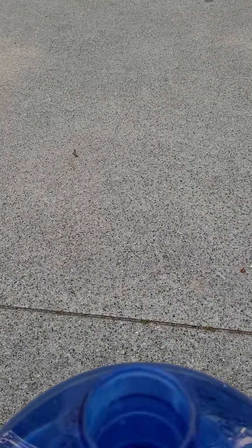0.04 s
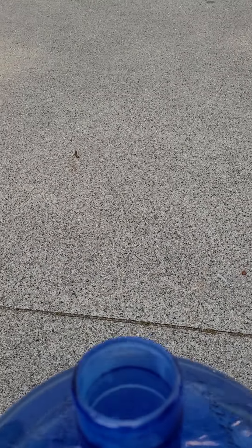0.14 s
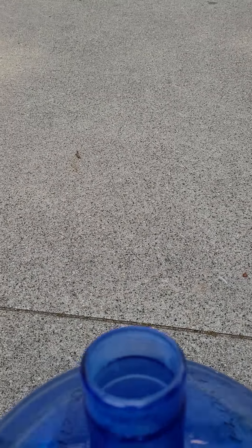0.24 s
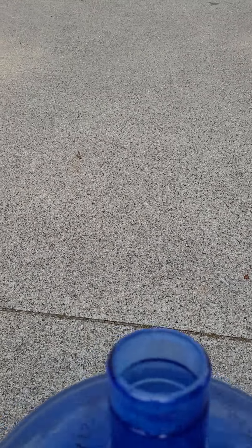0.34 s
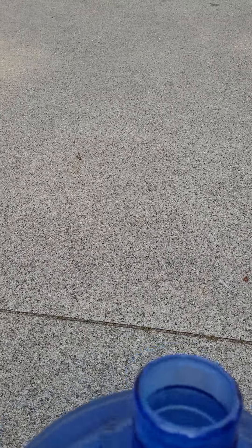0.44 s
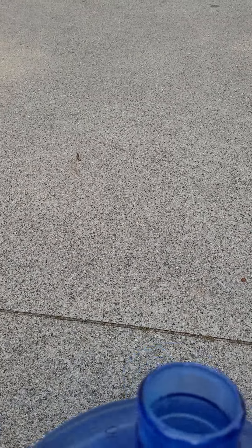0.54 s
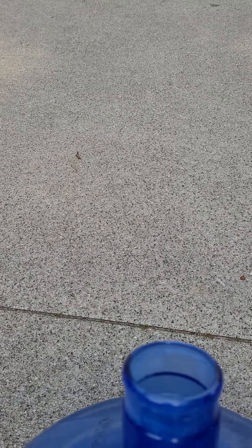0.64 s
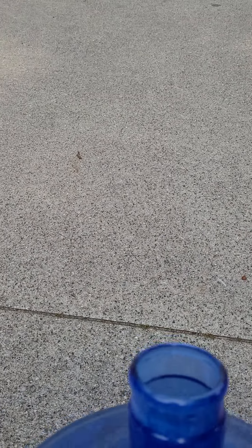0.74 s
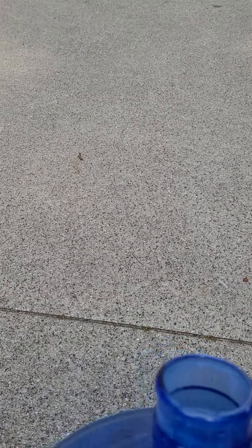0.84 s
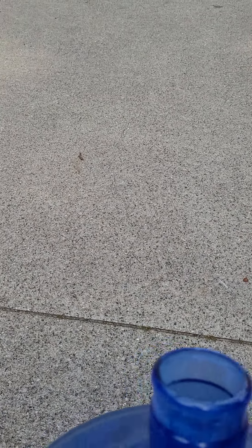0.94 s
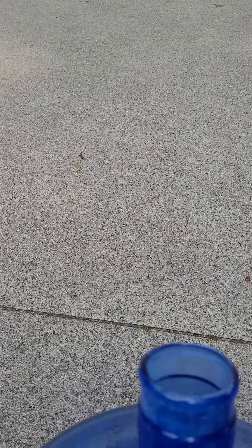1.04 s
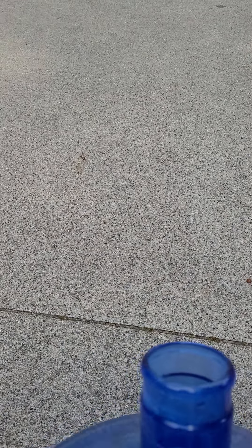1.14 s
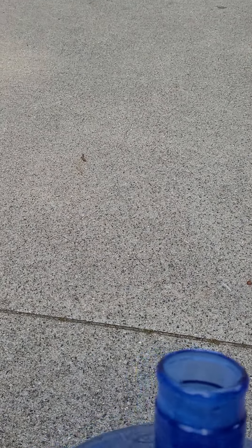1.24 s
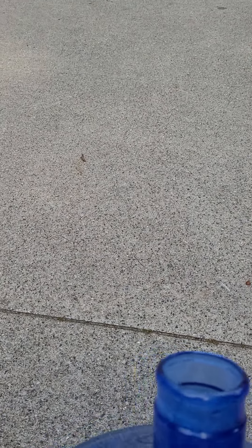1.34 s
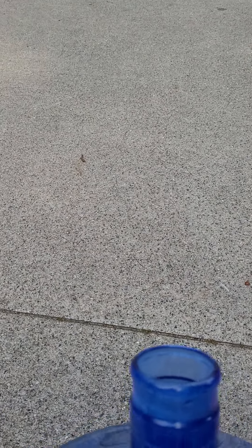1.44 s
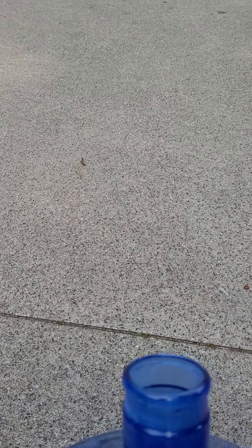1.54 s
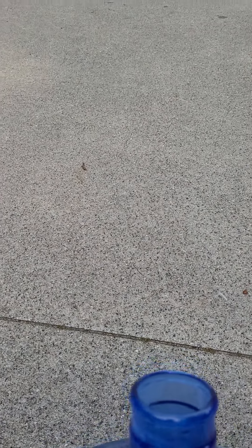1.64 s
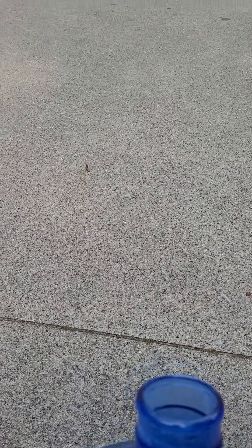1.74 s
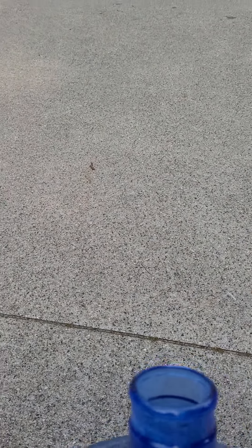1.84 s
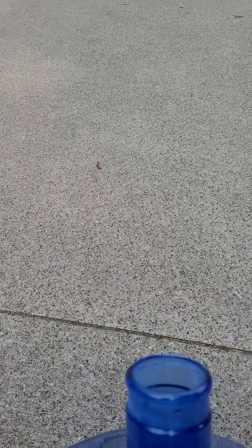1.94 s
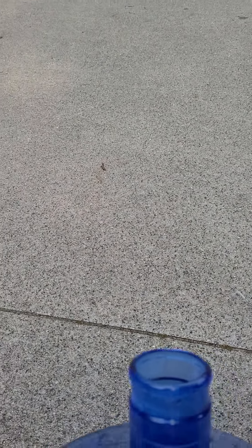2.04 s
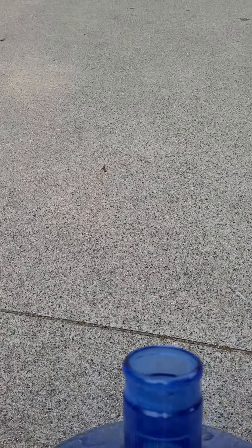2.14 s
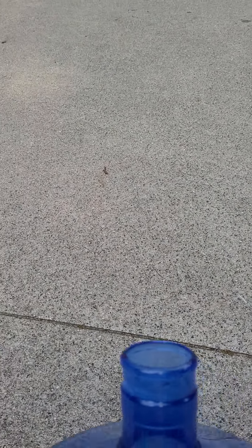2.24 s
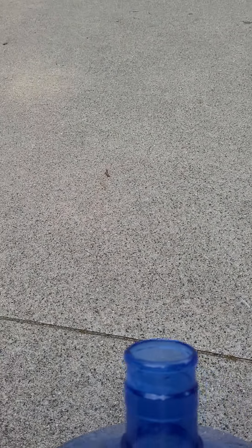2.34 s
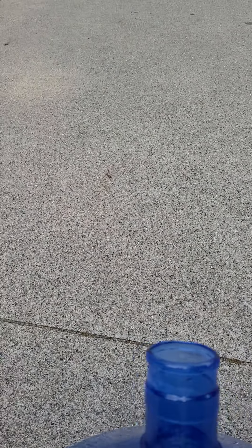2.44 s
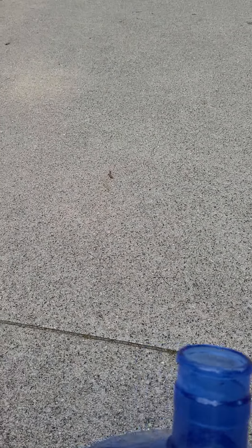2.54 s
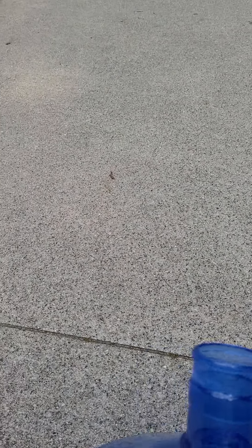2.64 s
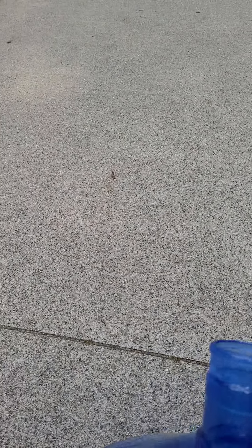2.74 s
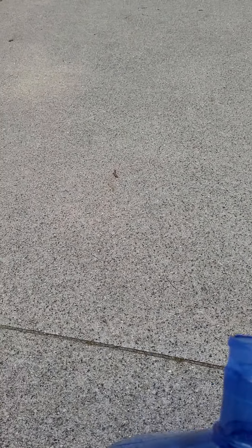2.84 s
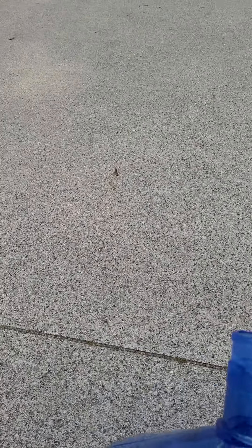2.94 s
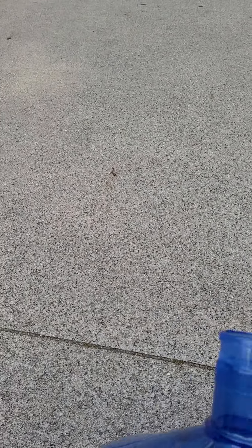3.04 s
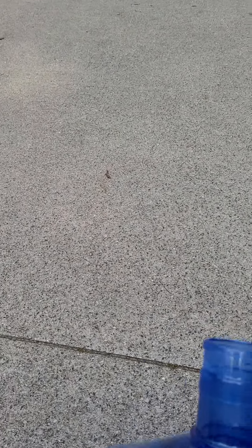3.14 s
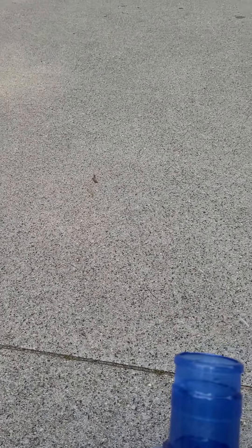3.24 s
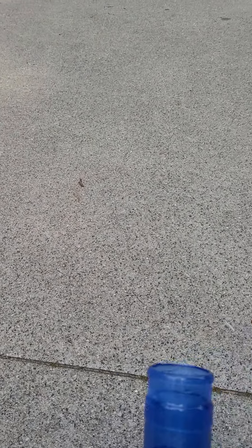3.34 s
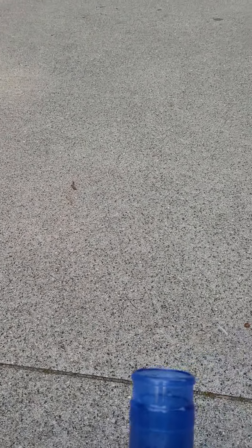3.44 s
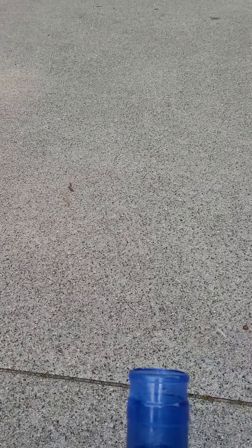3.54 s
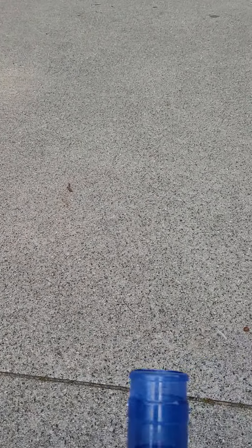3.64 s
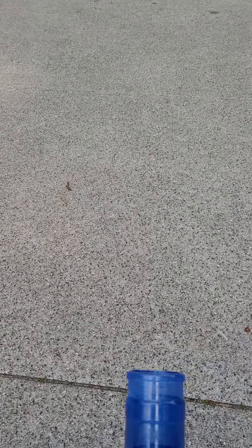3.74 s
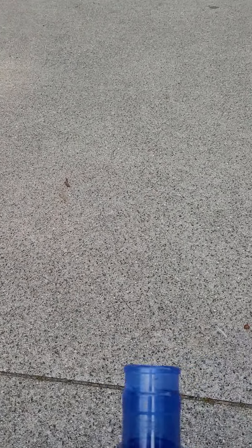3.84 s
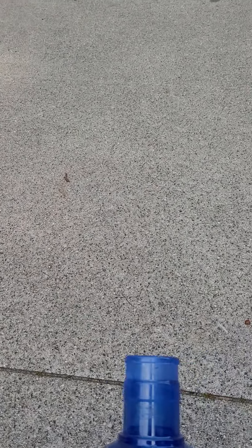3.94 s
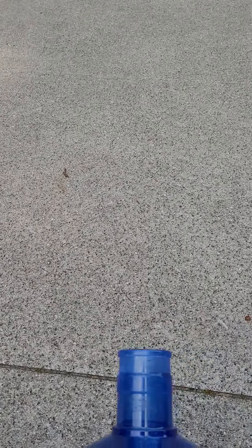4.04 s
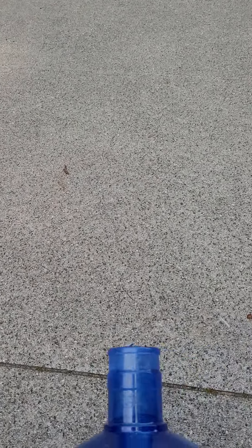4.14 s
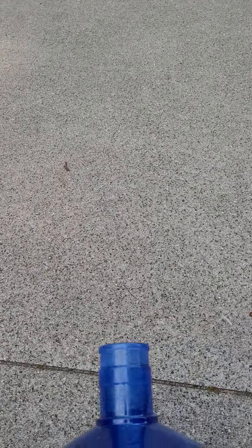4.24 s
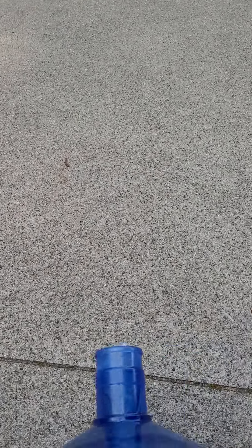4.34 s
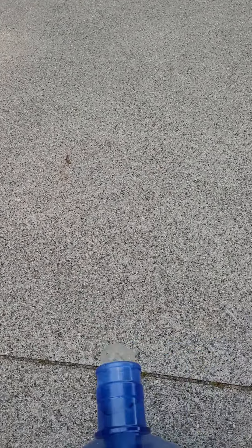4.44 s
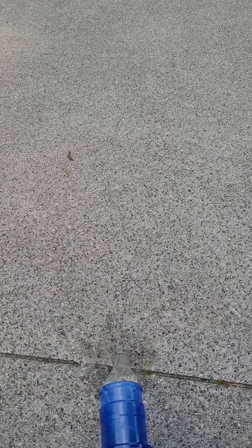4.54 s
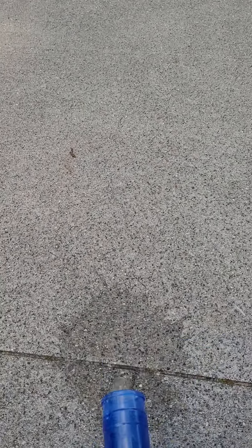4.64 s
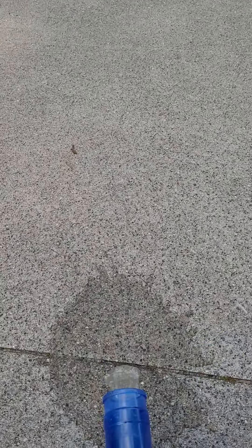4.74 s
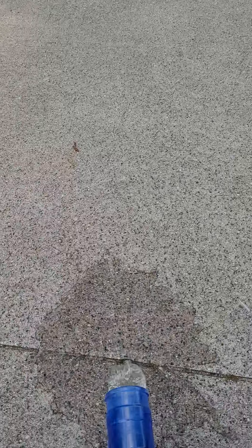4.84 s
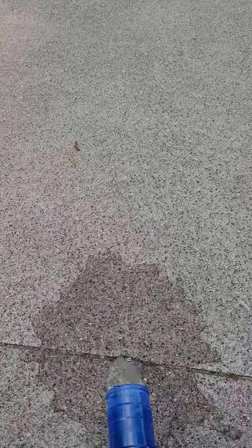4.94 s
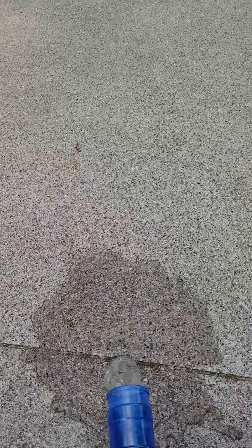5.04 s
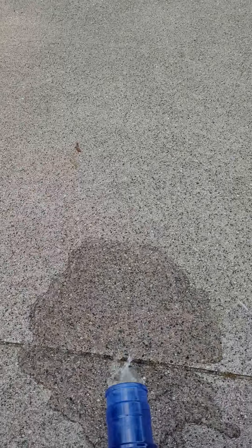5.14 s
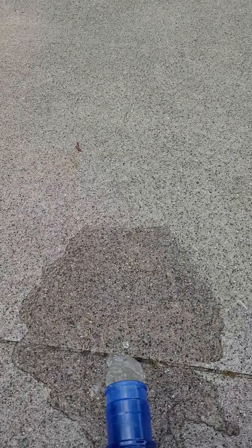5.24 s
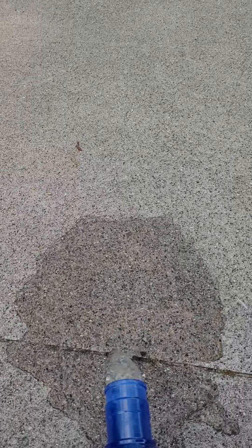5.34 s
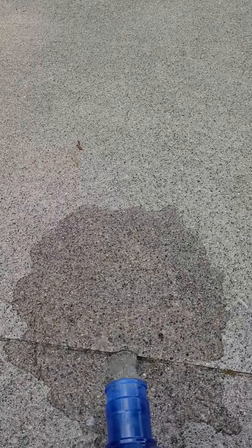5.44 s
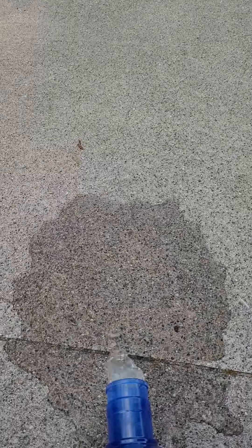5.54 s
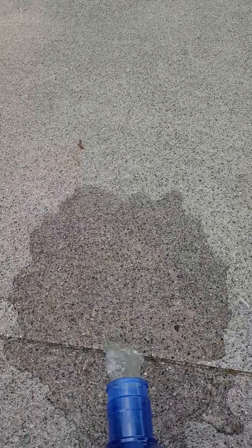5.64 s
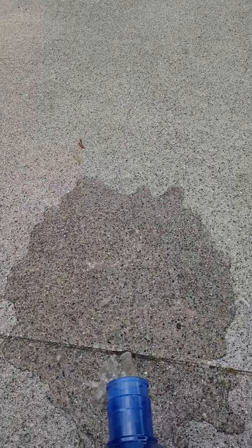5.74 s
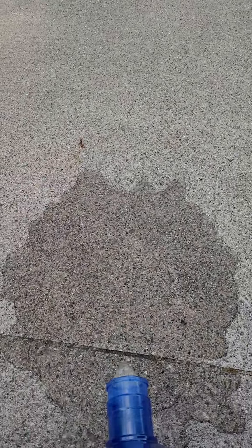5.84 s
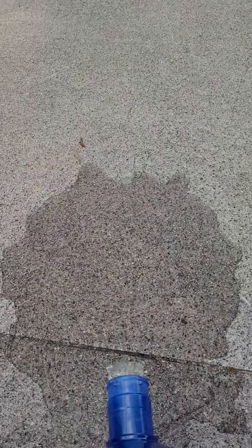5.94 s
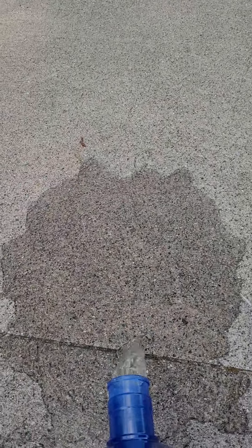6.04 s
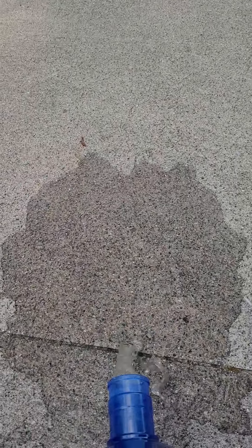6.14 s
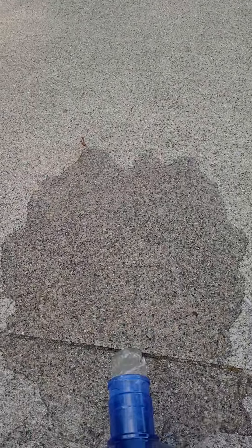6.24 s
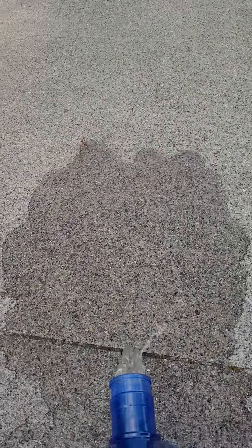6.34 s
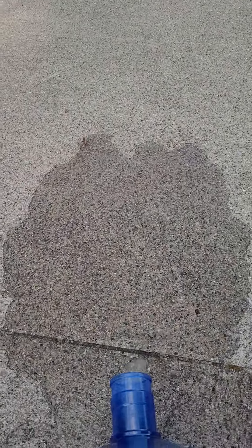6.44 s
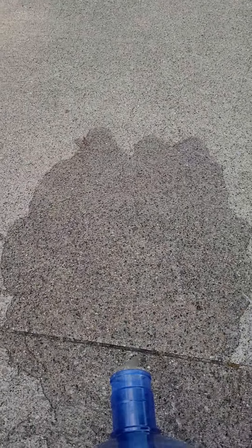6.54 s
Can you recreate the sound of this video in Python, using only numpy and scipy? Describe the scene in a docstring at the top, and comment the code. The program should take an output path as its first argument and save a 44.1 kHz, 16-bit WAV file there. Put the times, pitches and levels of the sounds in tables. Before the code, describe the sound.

Close hand-held phone outdoors, with soft air noise and low grip rumble. From 0 to about 0.9 s a large plastic bottle is dragged over concrete: hollow low drones with gritty stick-slip scraping, strongest from 0.3 s, a knock at 0.16 s and a sharp tick near 0.56 s. Another short drag groans at 1.1-1.35 s with a small clink and rumbling lumps. From 1.5 to 2.8 s come faint scuffs, plastic clicks and dull bumps; then it is mostly quiet, with a small pop at 3.1 s and light rustle. Around 4.3 s water sloshes toward the neck, hissing out at 4.5 s, with a heavy hollow thump near 4.7 s. Until 6.6 s it glugs irregularly, with prominent gulps at about 5.1, 5.5, 5.65, 5.9 and 6.3 s, rising bubble tones, thin watery whistles, wet slaps and droplets spattering on the slab.

```python
"""A hollow drone and a gritty scrape come first: a big plastic water bottle dragged over a concrete slab outdoors.
It is heard close, on a hand-held phone: stick-slip noise rings the body modes under cloth rustle and rumble.
Blows ring the body, ticks are short noise; water glugs from the neck as rising sines and splashes as small chirps.
The left microphone port is shaded: duller and slightly late."""
import sys
import numpy as np
from scipy import signal
from scipy.fft import rfft, irfft, next_fast_len
from scipy.io import wavfile
from scipy.ndimage import uniform_filter1d

SR = 44100
rng = np.random.default_rng(int(sys.argv[2]) if len(sys.argv) > 2 else 0)


def waveform_to_disk(signal):
    """Save audio, clipped to [-1, 1], as 16-bit WAV at the path in sys.argv[1]."""
    frames = np.transpose(np.atleast_2d(signal))
    scaled = np.clip(frames, -1, 1) * 32767
    samples = np.round(scaled).astype(np.int16)
    wavfile.write(sys.argv[1], SR, samples)


N = 290199

# modes of the bottle's wall and air: f/Hz, width/Hz (rubbing widens it), level/dB
BODY_MODES = [(58.7, 31, -6), (150.4, 19.2, -4), (219.7, 27, -6.5), (291.1, 32.7, 2.5), (364, 22.7, 1),
              (499, 520, -14), (671, 18, -12), (1003, 200, -4), (1418, 120, -6), (1940, 230, -8)]
# dull blows on the body, from knocks and from gulps of air:
# t/s, level/dB before a common cut, favoured f/Hz, t60/s, churn after it re blow/dB before the band mix
BLOWS = [(0.161, -24, 373, 0.072, -13.5), (2.211, -27, 154, 0.86, -19), (2.445, -33.5, 149, 0.24, -15),
         (2.788, -34, 60.4, 0.049, -13), (3.548, -46, 69.4, 0.09, -21), (4.679, -11, 316, 0.082, -42),
         (4.685, -16.5, 68.5, 0.41, -17), (4.876, -25, 341, 0.14, -12), (4.907, -19, 298, 0.12, -25),
         (4.928, -19.5, 256, 0.1, -35), (4.964, -35, 387, 0.12, -8), (4.996, -29, 261.5, 0.37, -23),
         (5.125, -30, 116.5, 0.79, -0.5), (5.195, -34, 149, 0.015, -8), (5.216, -21, 423, 0.17, -11.5),
         (5.264, -31, 72.8, 0.9, -23), (5.508, -30, 242, 0.072, -16), (5.531, -27.5, 130, 0.5, -15),
         (5.532, -13.5, 439, 0.056, -21), (5.652, -35, 80, 0.1, -12), (5.756, -24.5, 142, 0.22, -35),
         (5.907, -22, 124, 0.33, -10), (5.956, -24.5, 76, 0.39, -11), (6.157, -20.5, 125.7, 0.31, -46),
         (6.251, -27.5, 95.5, 0.36, -16), (6.334, -25, 101, 0.094, -6.5), (6.366, -26, 139, 0.35, -27),
         (6.537, -21.5, 149, 0.13, -21)]
# water surges into the neck, then runs:
# t/s, slosh drone level/dB, upper body modes re drone/dB before their mix, splash level/dB before clumping
SURGES = [(4.27, -48.5, -6.5, -70), (4.39, -45, 14, -60), (4.56, -39, 11, -53.5), (4.7, -40, 11, -44.5),
          (4.78, -39, -9, -60.5), (4.93, -45, 2, -50), (5.05, -50, -19, -66), (5.2, -45.5, -2, -42.5),
          (5.35, -42.5, -10.5, -63), (5.6, -51, 1, -63), (5.96, -47, -0.5, -58), (6.58, -56, 0, -67)]


def gain_of(db):
    """Decibels to a factor."""
    return 10 ** (np.asarray(db) / 20)


def evened(x):
    """Scaled to rms 1."""
    return x / np.sqrt(np.mean(x ** 2) + 1e-20)


def read(points, hz):
    """A spectrum table on a log-frequency axis."""
    f, value = np.transpose(points)
    return np.interp(np.log(hz + 1), np.log(f + 1), value)


def curves(rows, off=None):
    """Every column of a time table, one value a sample; off is the value outside the table."""
    s, *columns = np.transpose(rows)
    return [np.interp(np.arange(N) / SR, s, c, off, off) for c in columns]


def add(mix, s, sound):
    """Lays a sound into the mix at a time in seconds."""
    part = mix[..., round(s * SR):][..., :sound.shape[-1]]
    part += sound[..., :part.shape[-1]]


def colour(x, db, lag_s=0):
    """Filters by a function of frequency giving dB, with an optional delay."""
    size = next_fast_len(x.shape[-1] + 512)
    hz = np.fft.rfftfreq(size, 1 / SR)
    response = gain_of(db(hz)) * np.exp(-2j * np.pi * hz * lag_s)
    return irfft(rfft(x, size) * response, size)[..., :x.shape[-1]]


def ring(x, hz, width):
    """One resonance, centre and width in Hz; at 0 Hz it is a lowpass."""
    r = np.exp(-np.pi * width / SR)
    return 2 * signal.lfilter([1 - r], [1, -r * np.exp(2j * np.pi * hz / SR)], x).real


def ring_twice(x, hz, width, second_width=None):
    """The same centre rung twice, for steeper skirts."""
    return ring(ring(x, hz, width), hz, second_width or width)


def random_hits(per_s, spread_db, longest=5):
    """Sparse impulses at random times; sizes spread exponentially in dB, up to a limit in spreads."""
    size = gain_of(spread_db * np.minimum(rng.exponential(1, N), longest))
    return size * (rng.random(N) < per_s / SR)


def grains(per_s, spread_db, hiss):
    """Sparse clicks of uneven size and either sign over a share of plain noise."""
    clicks = random_hits(per_s, spread_db) * rng.choice([-1., 1.], N)
    return evened(evened(clicks) + hiss * rng.standard_normal(N))


def bands(noise, hz, treble_db, sharp):
    """Noise with a peak at its centre, a broad floor around it and a share of treble."""
    peak = ring_twice(noise[0], hz, sharp * hz)
    floor = ring_twice(noise[0], 0.76 * hz + 900, 3600)
    body = evened(peak) + 0.39 * evened(floor)
    treble = ring(ring(noise[1], 10060, 4800), 13800, 4200)
    return evened(body) + gain_of(treble_db) * evened(treble)


def ports(x, shade, lag_s):
    """One sound at both ports: the left shaded, late and smeared as sound creeps round the hand."""
    scatter_db, scatter_t60_s = 1, 0.012
    t = np.arange(400) / SR
    taps = rng.standard_normal(400) * gain_of(-60 * t / scatter_t60_s)
    smear = signal.oaconvolve(x, taps / np.linalg.norm(taps))[:N]
    smear = colour(smear, lambda hz: scatter_db - 40. * (hz < 2600))  # mainly treble
    left = colour(x + smear, lambda hz: read(shade, hz) / 2, lag_s)
    right = colour(x, lambda hz: -read(shade, hz) / 2)
    return np.array([left, right])


def wide(table, patchy_db):
    """Noise with patches drifting in time and frequency, most alike at the two ports in the bass."""
    # left-right likeness of the diffuse sound: f/Hz, correlation (1 is identical)
    likeness = [(60, 0.88), (180, 1), (550, 0.35), (1650, -0.16), (4970, 0.1), (15000, -0.035)]
    # shading of the diffuse sound: f/Hz, left minus right level/dB
    far_shade = [(60, -0.5), (150, -2), (380, -2), (950, -2), (2380, -11), (5980, -20.5), (15000, -11)]
    frames, hz = N // 256 + 5, np.fft.rfftfreq(1024, 1 / SR)
    a, b, c, d, patches = rng.standard_normal((frames, 513, 5)).T
    patches = evened(uniform_filter1d(uniform_filter1d(patches, 14, 0), 12, 1))
    same = np.clip(read(likeness, hz), -1, 1)[:, None]
    shade_db = read(far_shade, hz)[:, None] / 2
    left = a + 1j * b
    right = same * left + np.sqrt(1 - same ** 2) * (c + 1j * d)
    z = np.array([left * gain_of(shade_db), right * gain_of(-shade_db)])
    z = z * gain_of(read(table, hz)[:, None] + patchy_db * patches)
    y = signal.istft(z, nperseg=1024, noverlap=768)[1][:, :N]
    return y / np.sqrt(np.mean(y.mean(0) ** 2))


def drags():
    """Levels of drone, upper modes and grit: each drag swells, holds and dies, the bright parts faster."""
    # drags over the slab: start t/s, hold/s, drone level/dB, upper body modes re drone/dB, grit re drone/dB
    pulls = [(0.0, 0.36, -42, -4.5, -13), (0.307, 0.24, -29, -5, -12), (0.376, 0.026, -35.5, 4, -13.5),
             (0.601, 0.14, -33.5, 5, -7.5), (0.725, 0.03, -31, -20, -14.5), (1.13, 0.15, -31, -3, -14),
             (1.587, 0.025, -46.5, -17, -4.5), (1.698, 0.037, -47, 9.5, 8), (1.736, 0.023, -50, 1.5, 10)]
    attack_s = 0.028
    fall_db_per_s = np.array([[148], [339], [339]])  # drone, upper modes, grit
    out, t = np.zeros((3, N)), np.arange(SR) / SR
    for s, hold, db, upper_db, grit_db in pulls:
        after = np.maximum(t - attack_s - hold, 0)
        parts_db = db + np.array([[0], [upper_db], [grit_db]])
        add(out, s, np.minimum(t / attack_s, 1) * gain_of(parts_db - fall_db_per_s * after))
    return out


def churn_level():
    """Level of the water's churn, which starts with each blow and dies away."""
    out, t = np.zeros(N), np.arange(SR // 2) / SR
    for s, db, hz, t60, churn_db in BLOWS:
        add(out, s, gain_of(db + churn_db - 60 * t / 0.18) * (1 - np.exp(-t / 0.0017)))
    return out


def rubbing():
    """Stick-slip on the concrete, then churning water, drive the body modes; finer grit is heard directly."""
    # colour of the grit: f/Hz, relative level per Hz/dB
    grit_colour = [(240, -87), (400, 3), (583, -3.5), (669, -2.5), (787, -8.5), (2230, -22), (6380, -59),
                   (8000, -57), (10400, -58), (17600, -120)]
    widen, uneven_db, slosh_grit_db = 1.46, 3.5, -14.5
    slips = grains(600, 2.4, 1.0)
    modes = [gain_of(db) * evened(ring_twice(slips, hz, widen * w)) for hz, w, db in BODY_MODES]
    low, upper = evened(modes[1] + modes[2]), evened(sum(modes[3:6]))
    grit = evened(colour(grains(1500, 4.2, 0.48), lambda hz: read(grit_colour, hz)))
    grit = evened(grit + 0.62 * evened(sum(modes[6:])))
    grit = grit * gain_of(uneven_db * evened(ring(rng.standard_normal(N), 0, 31.5)))

    slosh_db, upper_db, _ = curves(SURGES, off=-62.5)
    slosh_drone = evened(ring_twice(slips, 150, 120, 130))
    slosh_bright = 0.41 * upper + 0.12 * evened(modes[4]) + gain_of(slosh_grit_db) * grit
    slosh = gain_of(slosh_db) * (slosh_drone + gain_of(upper_db) * slosh_bright)
    churn = churn_level() * (0.56 * low + upper + 0.58 * grit)
    return (drags() * [low, upper, grit]).sum(0) + slosh + churn


def rustle():
    """Hand and cloth rustle, then stream hiss: crackle in two bands, in short spatters once the stream breaks."""
    # hand and cloth, then the stream: t/s, level/dB before the crackle bands are spattered
    rustle_level = [(0, -65.5), (.3, -61), (.4, -52.5), (.66, -61), (.82, -69.5), (1.2, -59.5),
                    (1.4, -69.5), (1.67, -62.5), (2.47, -65.5), (3.05, -63.5), (3.2, -59.5), (3.55, -59),
                    (3.8, -63), (4.3, -62), (4.4, -56), (4.55, -49), (4.73, -58.5), (4.9, -56.5),
                    (6.58, -63.5)]
    # colour of the crackle: f/Hz, relative level per Hz/dB
    hiss_colour = [(1470, 11), (2500, 2), (2640, 0.5), (2940, 2), (5270, 2.5), (6550, -4), (8140, 1.5),
                   (11700, 4), (16000, -1)]
    top_db = 0.5  # above 8500 Hz, against the band below
    level_db = curves(rustle_level)[0]
    flicker = evened(uniform_filter1d(grains(130, 2.8, 0.45) ** 2, 120))
    crackle = wide(hiss_colour, 1.4) * gain_of(2.0 * flicker.clip(-2, 3))
    low = colour(crackle, lambda hz: -80. * (hz > 8500))
    top = crackle - low
    low = low / low.mean(0).std() * spatter()
    top = top / top.mean(0).std() * spatter()
    return gain_of(level_db) * (low + gain_of(top_db) * top)


def rumble():
    """Lumpy low noise from air and grip, partly its own at each port, stronger on the right."""
    # low rumble at the ports: t/s, level/dB of the pair before the left-right split
    rumble_level = [(0.0, -44), (0.3, -49), (0.4, -38.5), (0.9, -40), (1.1, -45), (1.7, -43), (2.0, -71),
                    (4.0, -58), (4.6, -49), (6.58, -53.5)]
    # sudden lumps in it: t/s, level/dB before the rise and fall
    lumps = [(0.999, -30), (1.21, -39), (1.351, -31), (1.52, -48), (2.78, -32.5), (3.52, -43), (4.72, -29),
             (5.28, -49), (5.92, -42)]
    rise_s, t60_s = 0.014, 0.13
    both, left, right = rng.standard_normal((3, N))
    pair = np.array([both + 0.55 * left, both + 1.0 * right])
    pair = ring_twice(pair, 62.5, 37)
    pair = pair + 0.069 * ring_twice(pair, 53.6, 41)
    level, t = gain_of(curves(rumble_level)[0]), np.arange(SR // 2) / SR
    for s, db in lumps:
        add(level, s, gain_of(db - 60 * t / t60_s) * np.minimum(t / rise_s, 1))
    return level * gain_of([[-3.], [3.]]) * pair / pair.mean(0).std()


def air():
    """Steady, patchy outdoor air noise at both ports."""
    # colour of the air: f/Hz, relative level per Hz/dB
    air_colour = [(15, -47), (25, 3), (82, 6.5), (223, 8), (344, -3.5), (695, -11.5), (840, -7.5),
                  (911, -6.5), (2910, -26.5), (5280, -48), (8360, -24), (11300, -93), (16000, -47)]
    return gain_of(-47.5) * wide(air_colour, 1.6)


def yard(x):
    """Ground and wall echoes: sparse taps that die fast, different at each port."""
    t = np.arange(6000) / SR
    taps = rng.standard_normal((2, 6000)) * (rng.random((2, 6000)) < .05)
    taps = taps * gain_of(-60 * t / 0.072) * (t > .002)
    return signal.fftconvolve(x, taps / np.linalg.norm(taps[0]), axes=1)[:, :N]


def thumps():
    """Each blow rings the low body modes, most those near its favoured pitch."""
    out, t = np.zeros(N), np.arange(SR // 2) / SR
    for s, db, hz, t60, churn_db in BLOWS:
        modes = sum(gain_of(-14 * abs(np.log2(f / hz))) * np.sin(2 * np.pi * f * t)
                    for f, w, level in BODY_MODES[:6])
        tone = 0.82 * modes + np.sin(2 * np.pi * hz * t)
        add(out, s, gain_of(db - 8.5 - 60 * t / t60) * tone * (1 - np.exp(-t / 0.00047)))
    return out


def ticks():
    """Each tick is a few milliseconds of noise with a short ring at its centre, over a lower knock."""
    # plastic ticks and slaps of water: t/s, level/dB before a common cut, centre f/Hz, treble re body/dB
    taps = [(0.161, -21.5, 1960, 7.5), (0.261, -47, 5470, 9), (0.463, -40, 1820, 15.5),
            (0.542, -38, 5580, 2), (0.558, -18, 1940, -3), (0.625, -25, 2070, -2), (0.792, -44, 2160, 22),
            (1.048, -32.5, 5200, -7), (1.12, -40.5, 4660, 7), (1.135, -55, 4900, 8),
            (1.149, -46, 1840, -33), (1.235, -43, 2870, -20), (1.246, -32, 2000, -33),
            (1.603, -39, 4450, -8), (1.615, -38, 2780, -6), (1.635, -37, 3200, -12),
            (1.732, -33, 3000, -15), (1.747, -24, 2780, -25), (1.774, -18, 1850, -18),
            (1.788, -48, 2680, -17), (2.061, -36, 4570, -10), (2.0638, -28, 2030, -12),
            (2.079, -34, 4440, -3), (2.0995, -40.5, 6900, 2), (2.3, -39.5, 2210, -54),
            (2.325, -35.5, 1960, -20), (2.3534, -39.5, 2310, -20), (2.4628, -25.5, 2000, -7),
            (2.547, -21, 2850, -9), (2.7332, -33.5, 2150, -8), (3.005, -42.5, 2260, -45),
            (3.021, -45, 3330, -38), (3.114, -37, 3920, 2), (4.147, -46, 5100, 3), (4.34, -47, 3020, 8),
            (4.387, -40.5, 5340, 4), (4.541, -29, 2730, -20), (4.576, -31.5, 2550, 7.5),
            (4.588, -28.5, 2720, -18), (4.677, -40, 2720, -20), (4.7087, -18.5, 2230, -39),
            (4.726, -33, 2900, -30), (4.8527, -32, 4630, -23), (4.873, -22.5, 2270, -45),
            (4.904, -38, 1750, 1), (4.953, -27.5, 2400, -37), (5.101, -34, 3040, -24),
            (5.133, -42, 2530, -15), (5.1978, -21, 2240, -5), (5.2114, -13, 2250, -16),
            (5.222, -18, 1430, -18), (5.2668, -26.5, 2400, -28), (5.393, -32, 3150, -22),
            (5.404, -37, 6000, -1), (5.437, -35, 4770, -38), (5.4874, -28, 3400, -15),
            (5.508, -38, 2960, -16), (5.532, -41, 2300, -7), (5.582, -30.5, 2700, -3),
            (5.5994, -32.5, 4600, -56), (5.649, -20.5, 2295, -45), (5.701, -35, 6000, -11),
            (5.731, -52, 6900, 16), (5.8116, -32, 5300, 3.5), (5.9065, -28, 3550, -20),
            (5.926, -26, 3500, -36), (5.9367, -21, 2400, -51), (5.951, -29.5, 2340, -43),
            (6.003, -39, 2960, -41), (6.0697, -33.5, 2290, -45), (6.3, -35, 4620, -24),
            (6.325, -22, 2450, -51), (6.3417, -24.5, 2360, -53), (6.412, -32, 2010, 1),
            (6.457, -27.5, 2410, -29), (6.5006, -36, 4950, 11.5), (6.5353, -34, 1830, -2)]
    peak_s, knock_db = 0.0013, -3
    ring_db, ring_cycles = -19, 45  # cycles to fall 60 dB
    ring_per_treble = 0.6  # bright ticks are dry, dull ones ring: dB lost per dB of treble
    out, t = np.zeros(N), np.arange(2000) / SR
    u = t / peak_s
    snap = u ** 2 * np.exp(2 - 2 * u)
    for (s, db, hz, treble_db), noise in zip(taps, rng.standard_normal((len(taps), 3, 2000))):
        knock = gain_of(knock_db - 60 * t / 0.065) * evened(ring(noise[2], 1300, 1900))
        tone_db = ring_db - ring_per_treble * treble_db - 60 * t * hz / ring_cycles
        tone = gain_of(tone_db) * np.sin(2 * np.pi * hz * t)
        sound = bands(noise, hz, treble_db, 0.27) * snap + (knock + tone) * (1 - np.exp(-t / 0.001))
        add(out, s, gain_of(db - 11) * sound)
    return out


def rasps():
    """Dense rough grains that swell, hold and fade evenly."""
    # rasps of a hand on plastic and gushes of spray: t/s, length/s, body level/dB, centre f/Hz, treble re body/dB
    strokes = [(0.739, 0.047, -53, 2980, 16), (1.044, 0.056, -59, 5300, -13),
               (1.114, 0.05, -76.5, 4950, 21), (1.55, 0.11, -61.5, 4170, 3.5), (1.712, 0.1, -46, 1730, -3),
               (2.491, 0.1, -54, 2480, -33), (4.605, 0.12, -50, 2540, -2), (5.16, 0.092, -53, 2500, -32),
               (5.9, 0.027, -54, 4430, -5), (6.345, 0.036, -61, 2480, -4), (6.453, 0.0081, -43, 4200, 1)]
    out, rough = np.zeros(N), np.array([grains(2500, 4.0, .6), grains(2500, 4.0, .6)])
    for s, length, db, hz, treble_db in strokes:
        noise = rough[:, round(s * SR):round((s + length) * SR)]
        envelope = signal.windows.tukey(noise.shape[1], .4)
        add(out, s, gain_of(db) * bands(noise, hz, treble_db, .7) * envelope)
    return out


def clink():
    """One hard tap rings the collar's modes, each a dying sine."""
    # the collar's modes: f/Hz, level/dB, t60/s
    collar = [(1770, -27, 0.031), (2800, -38.5, 0.05), (4100, -49, 0.06), (5300, -47, 0.078),
              (6220, -50, 0.047)]
    out, t = np.zeros(N), np.arange(4000) / SR
    tones = sum(gain_of(db - 60 * t / t60) * np.sin(2 * np.pi * hz * t) for hz, db, t60 in collar)
    add(out, 1.1, tones * (1 - np.exp(-t / 0.00084)))
    return out


def glugs():
    """A bubble rings as a dying sine whose pitch climbs, with an overtone and a ragged froth after it."""
    # bubbles that pop in the water, most as they pinch off in the neck: t/s, level/dB, starting f/Hz, t60/s
    pops = [(1.565, -32.5, 1144, 0.047), (1.576, -37, 1100, 0.039), (3.105, -28.5, 860, 0.035),
            (4.44, -35, 2380, 0.025), (4.461, -34, 2290, 0.034), (4.478, -40, 2320, 0.093),
            (4.504, -27.5, 1360, 0.02), (4.664, -23, 1305, 0.049), (4.701, -22.5, 1495, 0.03),
            (4.708, -29.5, 1087, 0.079), (4.804, -30.5, 1360, 0.031), (4.873, -27, 730, 0.018),
            (4.878, -31, 1930, 0.037), (4.906, -42, 1680, 0.041), (5.042, -35.5, 1305, 0.039),
            (5.13, -21, 1240, 0.025), (5.259, -29.5, 700, 0.028), (5.269, -34, 1265, 0.045),
            (5.511, -16, 1335, 0.032), (5.532, -24.5, 1390, 0.035), (5.58, -26, 1194, 0.059),
            (5.65, -17, 970, 0.019), (5.658, -40, 1030, 0.035), (5.733, -41, 1306, 0.032),
            (5.754, -32.5, 1280, 0.033), (5.907, -14, 1245, 0.031), (5.942, -24, 1360, 0.029),
            (6.006, -34.5, 1254, 0.034), (6.157, -24.5, 1320, 0.034), (6.327, -18, 906, 0.012),
            (6.367, -28, 1220, 0.027), (6.535, -24.5, 1370, 0.033)]
    half_rise = 0.112  # half the pitch climb over one t60, as a share
    froth_db, froth_t60_s = -15, 0.085
    out, t = np.zeros(N), np.arange(SR // 6) / SR
    fizz = grains(900, 3.0, 0.3)
    for s, db, hz, t60 in pops:
        turn = 2 * np.pi * hz * (t + half_rise * t ** 2 / t60)
        fade = gain_of(-60 * t / t60)
        tone = np.sin(turn) + 0.061 * np.sin(2.0 * turn) * fade  # the overtone dies twice as fast
        drive = np.resize(fizz[round(s * SR):], len(t))
        froth = evened(ring(drive, hz, 153)) + 0.5 * evened(ring(drive, 1.64 * hz, 1200))
        sound = fade * tone + gain_of(froth_db - 60 * t / froth_t60_s) * froth
        add(out, s, gain_of(db) * sound * (1 - np.exp(-(t / 0.0015) ** 2)))
    return out


def bubbles(per_s, lo_hz, hi_hz, cycles, spread_db, count):
    """Random short chirps, each rising in pitch as it dies; most are small."""
    size = random_hits(per_s, spread_db)
    kind, out = rng.integers(0, count, N), np.zeros(N)
    for k, hz in enumerate(np.geomspace(lo_hz, hi_hz, count)):
        u = np.arange(0, 3, hz / cycles / SR)  # age, in spans of that many cycles
        chirp = np.sin(2 * np.pi * cycles * (u + 0.047 * u ** 2))
        chirp = chirp * np.exp(-2 * u) * (1 - np.exp(-u / 0.22))
        out += signal.oaconvolve(size * (kind == k), chirp)[:N]
    return evened(out)


def splash():
    """Small bubbles and droplets on the slab, some near one common size, with a finer fizz above them."""
    drops = bubbles(500, 802, 3020, 4.8, 2.66, count=20)
    drops = drops + 0.46 * bubbles(150, 2106, 2797, 32.3, 2.95, count=8)
    fizz = bubbles(200, 3600, 6200, 5.0, 5.5, count=12)
    clumps_db = 4.0 * evened(ring(rng.standard_normal(N), 0, 50))
    return gain_of(curves(SURGES, off=-99)[2] + clumps_db) * (drops + 0.26 * fizz)


def spatter():
    """A level that jumps for a moment as each stray drop lands, once the stream has broken up."""
    broken_from_s = 5.1
    drops = random_hits(90, 7.6, longest=3)
    t = np.arange(2500) / SR
    jump = gain_of(-60 * t / .015) * (1 - np.exp(-t / .002))
    level = .75 + .7 * signal.oaconvolve(drops, jump)[:N]
    return np.where(np.arange(N) / SR > broken_from_s, level, 1)


def whistles():
    """Narrow whistles and glug tones that scoop into a quickening glide, waver and fade or swell."""
    # thin wavering whistles and gliding glug tones of the neck:
    # start t/s, length/s, from f/Hz, to f/Hz, scoop up into the start/Hz, level/dB, change by the end/dB
    tones = [(5.16, 0.03, 1330, 1020, 0, -46, -6), (5.44, 0.088, 3580, 2680, 0, -53.5, 6),
             (5.455, 0.045, 1800, 2400, 0, -61, 0), (5.655, 0.11, 2300, 2560, -200, -57.5, -4),
             (5.912, 0.05, 1460, 1370, 300, -30, -4), (5.95, 0.055, 1250, 880, 0, -46, -10),
             (5.965, 0.155, 2920, 2840, 200, -46.5, -28), (6.02, 0.175, 2350, 2640, 80, -55, -4),
             (6.125, 0.14, 3030, 2900, 300, -49.5, -2), (6.245, 0.045, 1300, 1250, 150, -50, -2),
             (6.268, 0.06, 2950, 2860, 0, -57, -5)]
    scoop_s, glide_bend = 0.02, 1.6
    out, waver_db = np.zeros(N), 2.0 * evened(uniform_filter1d(rng.standard_normal(N), 300))
    wobble = 0.004 * evened(ring(rng.standard_normal(N), 0, 60))  # pitch unrest, as a share
    for s, length, from_hz, to_hz, scoop_hz, db, fade_db in tones:
        t = np.arange(0, length, 1 / SR)
        hz = from_hz + (to_hz - from_hz) * (t / length) ** glide_bend - scoop_hz * np.exp(-t / scoop_s)
        hz = hz * (1 + wobble[round(s * SR):][:len(t)])
        level = gain_of(db + fade_db * (t / length) ** 2) * signal.windows.tukey(len(t), 0.2)
        add(out, s, np.sqrt(2) * level * np.sin(2 * np.pi * np.cumsum(hz) / SR))
    return out * gain_of(waver_db)


def scene():
    """Everything at the two ports."""
    # shading of the body and ground sounds: f/Hz, left minus right level/dB before the smear
    near_shade = [(60, -1), (120, -0.5), (240, -3.5), (480, -3), (950, -7.5), (1890, -5), (3770, -11),
                  (7520, -20), (15000, -15.5)]
    # shading of the neck's tones: f/Hz, left minus right level/dB before the smear
    neck_shade = [(800, -11), (1400, -4.5), (3000, -5)]
    body_lag_s, neck_lag_s = 0.00035, 0.000093  # the neck lies more to the front, so its delay is smaller
    taps = ticks() + rasps() + clink()
    by_hand = np.arange(N) / SR < 4.3  # taps before this come from the body, later ones from the neck
    near = ports(rubbing() + thumps() + taps * by_hand, near_shade, body_lag_s)
    near = near + ports(splash() + taps * ~by_hand, near_shade, neck_lag_s)
    near = near + ports(glugs() + whistles(), neck_shade, neck_lag_s)
    echoes = gain_of(-13) * colour(yard(near), lambda hz: -12. * (hz < 500))
    return near + echoes + rustle() + rumble() + air()


def record(dry):
    """Microphone colour, then the band limit."""
    # response of the microphone: f/Hz, level/dB
    mic_colour = [(25, -18), (45, 1.5), (6500, -3), (8300, -18.5), (10500, -13)]
    heard = colour(dry, lambda hz: read(mic_colour, hz))
    band_limit = signal.firwin(511, 16250, window=("kaiser", 9), fs=SR)  # lowpass edge in Hz
    return signal.oaconvolve(heard, band_limit[None], "same")


dry = scene()
out = record(dry)
waveform_to_disk(out)
```